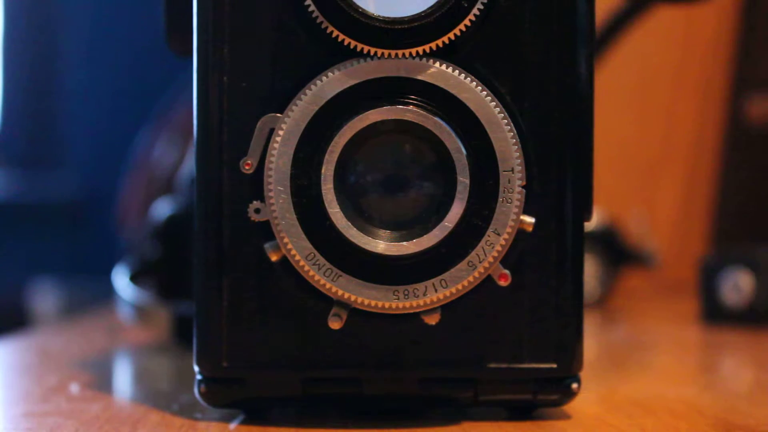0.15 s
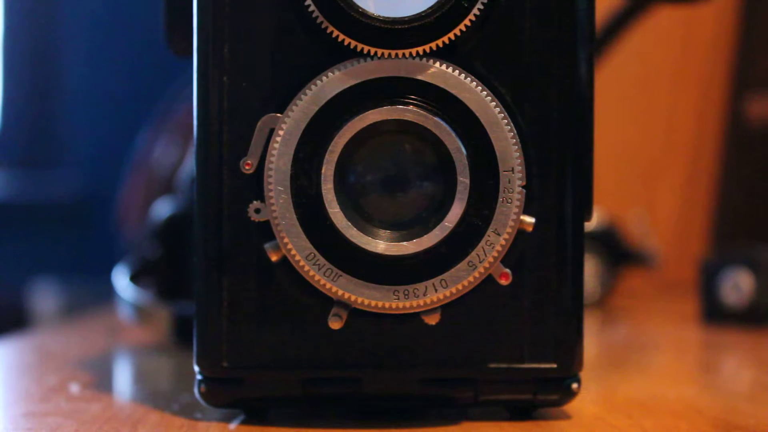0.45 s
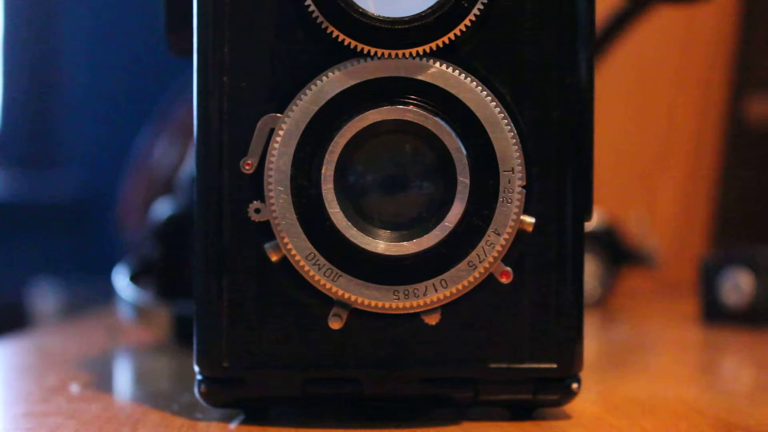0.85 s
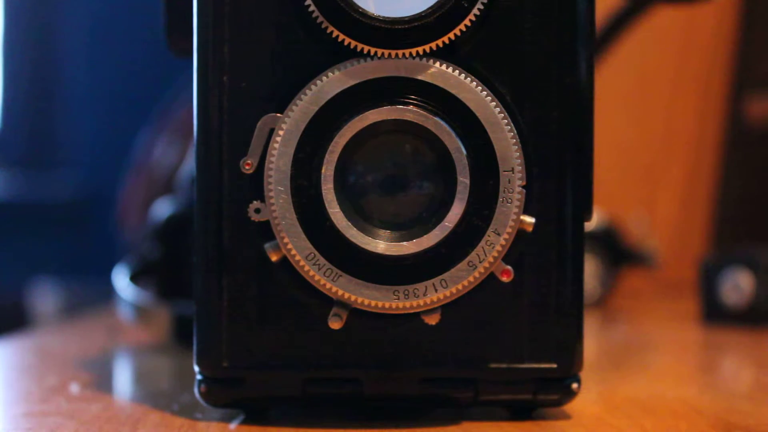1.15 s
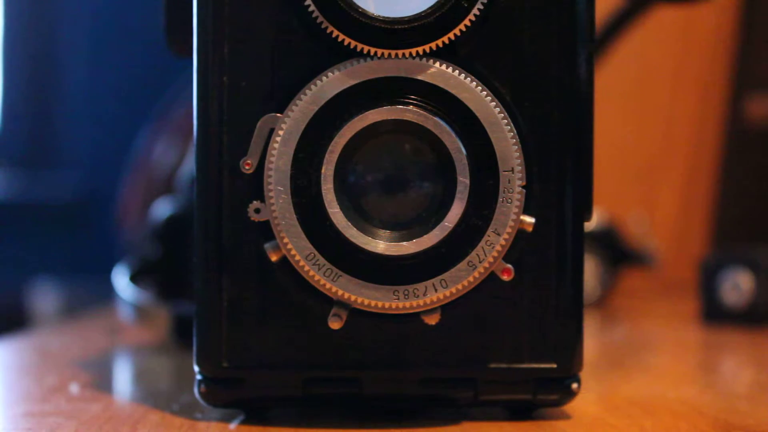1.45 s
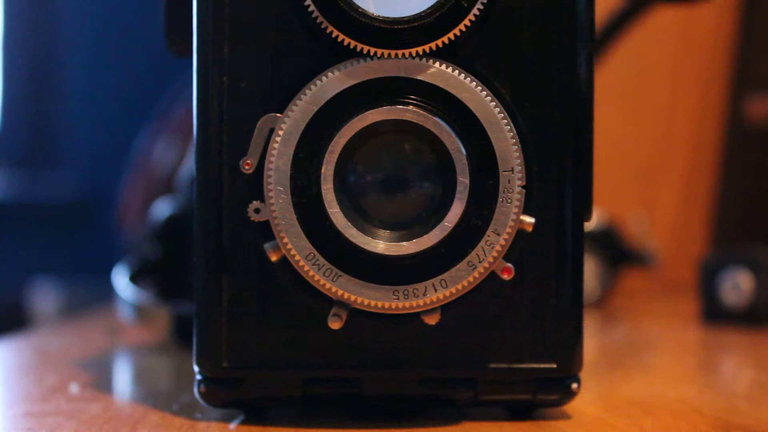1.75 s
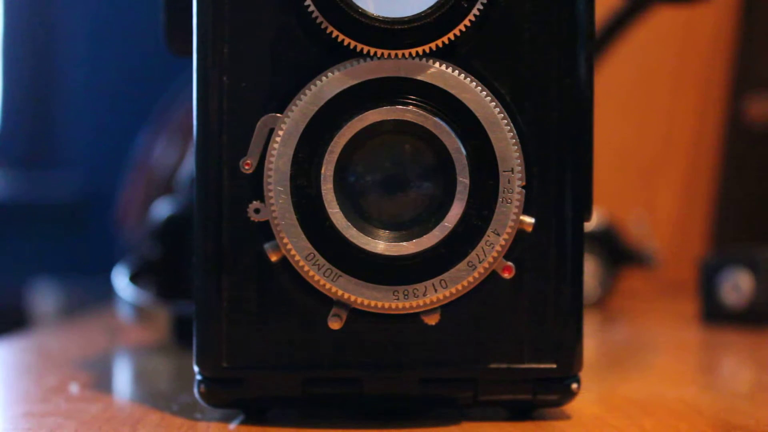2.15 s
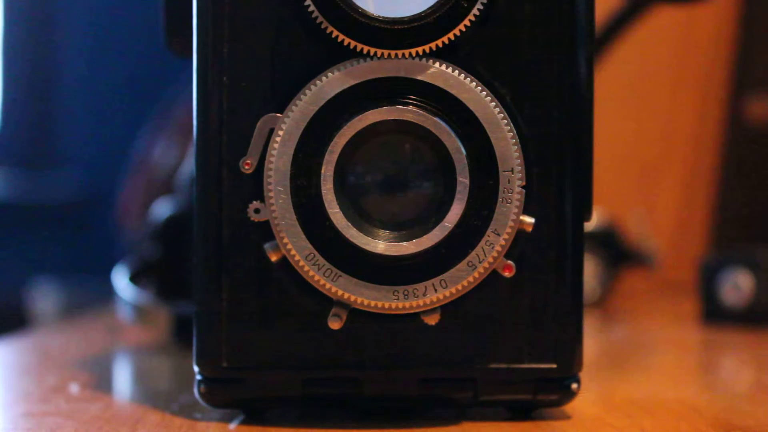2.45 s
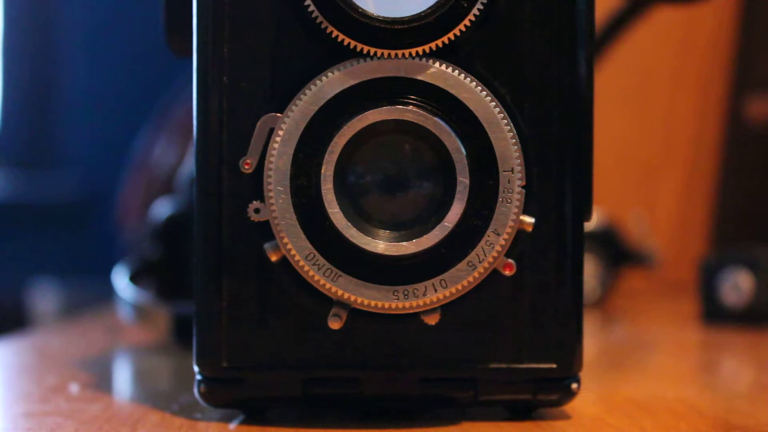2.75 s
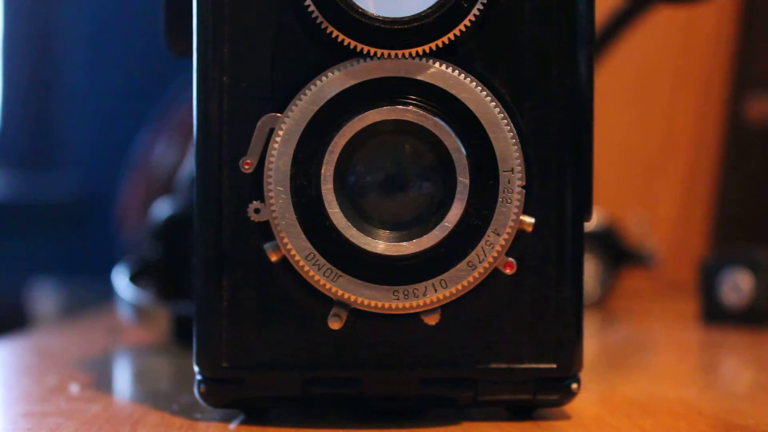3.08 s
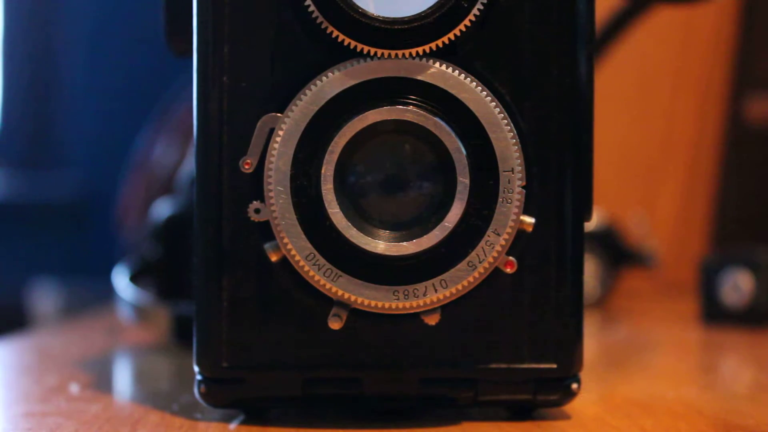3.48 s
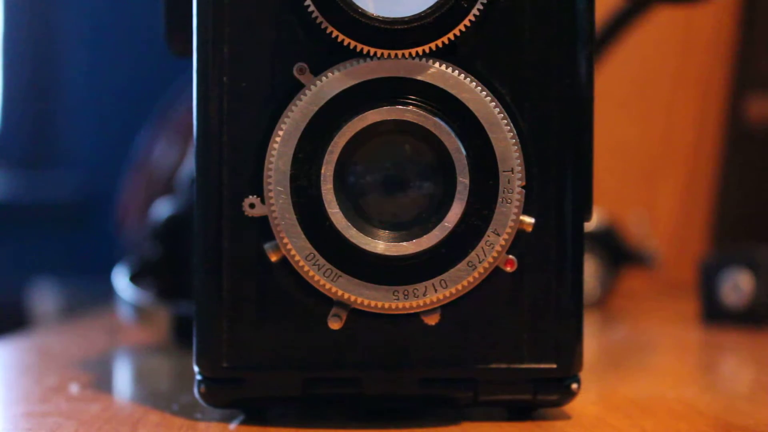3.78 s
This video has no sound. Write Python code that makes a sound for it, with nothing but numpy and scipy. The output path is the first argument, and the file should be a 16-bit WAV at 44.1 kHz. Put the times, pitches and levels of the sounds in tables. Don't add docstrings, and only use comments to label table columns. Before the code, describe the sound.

A clockwork self-timer on an old camera buzzes with fast, slightly uneven metallic ticking, then the shutter snaps open and shut loudly and the timer races briefly; close microphone, quiet room with faint hiss and hum.

```python
import sys
import numpy as np
from scipy import signal
from scipy.fft import rfft, irfft, next_fast_len
from scipy.io import wavfile

SR = 44100
rng = np.random.default_rng(int(sys.argv[2]) if len(sys.argv) > 2 else 0)


def to_wav(sig):
    pcm = np.clip(np.atleast_2d(sig), -1, 1) * 32767
    pcm = np.round(pcm).astype(np.int16)
    wavfile.write(sys.argv[1], SR, pcm.T)


def natural_amplitude(level_db):
    exponent = np.asarray(level_db, float) / 20
    return 10 ** exponent


N = 172872

# time_s, drive_db, seating_db
SPRING = [(0.0, -40, -2.5), (.3, -38.5, -2), (.6, -39, -2), (.9, -38.5, -2), (1.2, -38, -1.5),
          (1.51, -38.5, -0.5), (1.58, -38.5, -2.5), (1.9, -39.5, 1), (2.2, -38.5, 0.5), (2.5, -39, 0.5),
          (2.85, -39, 0.5), (3.15, -40, 1), (3.4, -38.5, 0), (3.71, -40, 2)]


def unit(x):
    return x / np.sqrt(np.mean(x ** 2) + 1e-20)


def along(points, hz):
    point_hz, value = np.transpose(points)
    return np.interp(np.log(hz + 1), np.log(point_hz + 1), value)


def filtered(x, response):
    size = next_fast_len(x.shape[-1] + 8192)
    spectrum = rfft(x, size) * response(np.fft.rfftfreq(size, 1 / SR))
    return irfft(spectrum, size)[..., :x.shape[-1]]


def high(hz, low_hz):
    return (1j * hz / (low_hz + 1j * hz)) ** 2


def banded(bands):
    def response(hz):
        power = sum(natural_amplitude(2 * db) / (1 + (2 * (hz - centre) / width) ** 4) for centre, width, db in bands)
        return np.sqrt(power)
    return unit(filtered(rng.standard_normal(N), response))


def place(start_s, rows):
    at = np.round(np.asarray(start_s) * SR).astype(int)[:, None] + np.arange(rows.shape[1])
    return np.bincount(at.ravel(), rows.ravel(), N + SR)[:N]


def rings(modes, t, count, vary_db):
    total = 0
    for hz, level_db, t60_s in modes:
        struck_db = level_db + vary_db * rng.standard_normal((count, 1))
        total = total + natural_amplitude(struck_db - 60 * t / t60_s) * np.sin(2 * np.pi * hz * t)
    return total


def ticks(start_s, level_db, modes, loose, vary_db, crack_db, crack_s, bounce_ms, bounce_db, cycles, shift_db=0):
    hz, tic_db, toc_db, t60_s = np.transpose(modes)
    t60_s = np.minimum(t60_s, cycles / hz)
    count = len(start_s)
    side = np.arange(count) % 2
    t = np.arange(SR // 20) / SR

    draw = rng.standard_normal((count, 2, len(hz)))
    phase = rng.uniform(0, 2 * np.pi, (2, len(hz)))[side] + loose * draw[:, 0]
    size = natural_amplitude(np.array([tic_db, toc_db])[side] + vary_db * draw[:, 1] + shift_db) * 0.01 / t60_s
    rise = 1 - np.exp(-hz[:, None] * t / 0.8)
    fade = natural_amplitude(-60 * t / t60_s[:, None]) * rise
    turn = 2 * np.pi * hz[:, None] * t
    ring = (size * np.cos(phase)) @ (fade * np.sin(turn))
    ring = ring + (size * np.sin(phase)) @ (fade * np.cos(turn))
    ring = ring * (1 - np.exp(-t / 0.00012)) / np.sqrt(np.sum(size ** 2, 1))[:, None]

    crack = 0.8 * rng.standard_normal((2, len(t)))[side] + 0.6 * rng.standard_normal(ring.shape)
    rows = ring + natural_amplitude(crack_db - 60 * t / crack_s) * crack
    rows = rows * natural_amplitude(level_db + 0.8 * rng.standard_normal(count))[:, None]
    late = rng.standard_normal((count, 2))
    bounce_s = start_s + (bounce_ms + 0.15 * late[:, 0]) / 1000
    return place(start_s, rows) + place(bounce_s, rows * natural_amplitude(bounce_db + 3 * late[:, 1:]))


def ambience():
    # hz, density_db
    air_points = [(18, -50), (30, -15), (115, -8.5), (426, -6), (499, -1.5), (988, -7), (1540, -3.5),
                  (7670, -18), (16000, -35)]
    # centre_hz, width_hz, level_db
    drone_bands = [(69, 34, -10.5), (269.3, 56.6, -1.5), (355, 35.4, 0), (504.6, 42, -2.5), (602, 106, -11),
                   (768, 126, -4.5)]
    hum_hz, beat_s, null_s, depth = 120.5, 1.74, 2.16, 0.6
    t = np.arange(N) / SR
    air = unit(filtered(rng.standard_normal(N), lambda hz: natural_amplitude(along(air_points, hz))))
    hum = np.sin(2 * np.pi * hum_hz * t)
    hum = hum - depth * np.sin(2 * np.pi * (hum_hz * t + (t - null_s) / beat_s))
    return natural_amplitude(-52) * air + natural_amplitude(-54) * banded(drone_bands) + natural_amplitude(-61) * hum


def gears():
    # centre_hz, width_hz, level_db
    whirr_bands = [(1564, 67, 3.5), (2400, 750, -3), (3580, 2400, -2.5), (4280, 91, 5), (5060, 670, 1.5),
                   (7700, 910, -34), (11100, 4900, -26)]
    whirr_db, freed_s, freed_db = -57.5, 3.81, 17.5
    t = np.arange(N) / SR
    time_s, drive_db, _ = np.transpose(SPRING)
    swing_db = np.interp(t, time_s, drive_db - drive_db.mean())
    return natural_amplitude(whirr_db + swing_db + freed_db * (t > freed_s)) * banded(whirr_bands)


def timer():
    # start_s, growing_drag_ms, end_drag_ms
    turns = [(0.0183, 0.12, -0.37), (0.1379, 0.66, -0.92), (0.2665, -0.11, -2.83), (0.4075, 0.04, 0.16),
             (0.5327, 1.65, -0.31), (0.6641, -0.39, -0.34), (0.7966, -0.26, -0.05), (0.9188, -0.65, -0.18),
             (1.0451, 0.29, -0.28), (1.1678, 0.81, 0.33), (1.3003, -0.75, 0.52), (1.4217, 0.47, 0.73),
             (1.5387, 0.22, -4.04), (1.6999, -0.33, -0.37), (1.8455, 0.89, 1.3), (1.988, -1.08, 1.45),
             (2.1232, 0.3, -1.23), (2.2529, -0.44, -2.53), (2.4003, -0.39, 0.17), (2.5305, 1.01, 0.56),
             (2.6626, 0.29, -1.09), (2.7936, -0.44, -0.13), (2.9251, -0.75, -1.67), (3.0653, 1.77, -1.64),
             (3.2124, 3.24, 1.83), (3.3856, -0.84, -0.39), (3.5501, -0.94, -0.45), (3.692, 0, 0)]
    teeth_ms = [12.72, 12.93, 10.9, 12.06, 11.38, 14.92, 10.93, 12.13, 11.12, 13.05]
    # hz, tic_db, toc_db, t60_s
    plate = [(1590, 2.5, -0.5, 0.065), (2180, -5, -3, 0.019), (3050, -7, -2, 0.015),
             (3860, -2, -3.5, 0.0059), (4157, -2.5, 2, 0.056), (2410, -13, -3.5, 0.019),
             (5500, -6, -9.5, 0.007), (6500, -2, -1, 0.005), (7690, 1.5, 0.5, 0.0066),
             (8620, -3.5, -5.5, 0.0055), (9540, -3, -14.5, 0.0044), (10960, -6.5, -15, 0.014),
             (13300, -14, -12.5, 0.0036), (3213, -4.5, -2, 0.013)]
    seat_follow = [-.5, 1, -1, 0, 1, 1, 0, 0, 0, 0, 0, 0, 0, -1]
    first_s, lag_s, short_share = 0.0044, 0.0003, 0.25
    tick_db, drag_db_per_ms = 16.5, -0.87

    start_s, grow_ms, ends_ms = np.transpose(turns)
    share = np.tile([short_share, 1 - short_share], 5) / 5
    u = np.linspace(-1, 1, 10)
    shape = np.array([u, u * u - np.mean(u * u)]) * share * 10
    shape = shape - shape.sum(1)[:, None] * share
    extra_ms = (np.diff(start_s) * 1000 - np.sum(teeth_ms))[:, None] * share
    extra_ms = extra_ms + np.array([grow_ms, ends_ms]).T[:-1] @ shape
    swings_s = (teeth_ms + extra_ms).ravel() / 1000
    gaps_s = np.concatenate([[start_s[0] - first_s], swings_s, [0.0125, 0.0146]])
    beat_s = first_s + np.cumsum(np.r_[0, gaps_s])
    drag_ms = np.concatenate([[0, 0], extra_ms.ravel(), [0, 0]])

    time_s, drive_db, seat_db = np.transpose(SPRING)
    level_db = np.interp(beat_s, time_s, drive_db) + tick_db + drag_db_per_ms * drag_ms
    beat_s, level_db = np.roll(beat_s, -1), np.roll(level_db, -1)
    return ticks(beat_s + lag_s, level_db, plate, loose=0.5, vary_db=1.2, crack_db=-8.5, crack_s=0.0049,
                 bounce_ms=0.92, bounce_db=-13, cycles=170,
                 shift_db=np.outer(np.interp(beat_s, time_s, seat_db), seat_follow))


def shutter():
    blow_s = [3.7189, 3.7216, 3.724, 3.7247, 3.7257, 3.7283, 3.799, 3.8012, 3.8021, 3.8032, 3.8053, 3.8067,
              3.8083, 3.8105]
    # level_db, noise_t60_s, case_ring_db
    blows = [(-38, .02, -10), (-23, 0.028, -13), (-4, 0.0083, -1.5), (-4.5, 0.0052, 2), (-7, 0.012, -5),
             (-19, 0.03, -10), (-8, 0.0054, -7), (-7.5, 0.006, -2), (-11, 0.018, -2), (-9.5, 0.008, 3),
             (-9, 0.017, 1), (-4, 0.0037, -6), (-13, 0.011, -5), (-33, 0.024, -7)]
    # hz, density_db
    snap = [(470, -39), (800, -31), (1290, 1.5), (2350, -4.5), (4080, -4.5), (4630, -5.5), (9690, -5),
            (16000, -12)]
    slam = [(470, -54), (800, -32), (1660, -10.5), (5380, -11.5), (6300, -12), (7640, -8), (15000, -12),
            (16000, -12.5)]
    # hz, level_db, t60_s
    case_modes = [(1194, -8.5, 0.0083), (4060, -13, 0.011), (6500, -5, 0.013), (7540, -7, 0.025),
                  (9840, -7, .005)]
    blade_modes = [(5900, -14, .01), (7410, -5, 0.011), (7660, -8, .014), (10300, -3, .008),
                   (11200, -4, .008)]
    thud_modes = [(350, -26.5, 0.035), (526, -30, 0.023), (920, -37, .02)]
    # hz, level_db, t60_s
    body_modes = [(262, 0, .22), (299, -3, .07)]
    # start_s, level_db
    knocks = [
        (3.7215, -38),
        (3.7995, -27),
    ]
    thud_s = 3.7238

    level_db, t60_s, ring_db = np.transpose(blows)
    t = np.arange(SR // 4) / SR

    def colour(points, count):
        white = rng.standard_normal((count, len(t)))
        return unit(filtered(white, lambda hz: natural_amplitude(along(points, hz))))

    noise = np.r_[colour(snap, count=6), colour(slam, count=8)]
    ring = np.r_[rings(case_modes, t, count=6, vary_db=2), rings(blade_modes, t, count=8, vary_db=2)]
    rows = noise * natural_amplitude(-60 * t / np.minimum(t60_s, 0.03)[:, None]) + natural_amplitude(ring_db)[:, None] * ring
    rows = rows * (1 - np.exp(-t / 0.00012))
    snaps = filtered(place(blow_s, rows * natural_amplitude(level_db)[:, None]), lambda hz: high(hz, low_hz=480))

    body = rings(body_modes[:1], t, count=1, vary_db=2) - rings(body_modes[1:], t, count=1, vary_db=2)
    body = body * (1 - np.exp(-t / 0.0054))
    knock_s, knock_db = np.transpose(knocks)
    thud = place([thud_s], rings(thud_modes, t, count=1, vary_db=0.5))
    thud = filtered(thud, lambda hz: high(hz, low_hz=260) ** 2)
    return snaps + place(knock_s, natural_amplitude(knock_db)[:, None] * body) + thud


def rattle():
    # start_s, level_db
    beats = [(3.7304, -7), (3.7342, -8), (3.7392, -12), (3.7429, -9), (3.7479, -13), (3.7515, -12),
             (3.7567, -12), (3.7603, -9), (3.7656, -13), (3.7693, -11), (3.7743, -12), (3.778, -11),
             (3.7832, -12), (3.7867, -11), (3.7915, -12), (3.7955, -8)]
    # hz, tic_db, toc_db, t60_s
    ring_modes = [(1320, 5, 4, 0.023), (1665, 7, 8.5, 0.027), (1900, 7, 5.5, 0.013), (2800, 0, -9, 0.014),
                  (3020, -1, -4, 0.021), (3530, -10, -1, 0.019), (4100, -14, -8, 0.014),
                  (5230, -1, -6, 0.013), (7330, -5, -2, .012), (7470, -12, 0, .012),
                  (8500, -12, -17, 0.0071), (9970, -12, -5, 0.0048), (12400, -19, -22, 0.0057),
                  (15100, -6, -9, 0.0033)]
    start_s, level_db = np.transpose(beats)
    chatter = ticks(start_s, level_db + 0.5, ring_modes, loose=0.6, vary_db=1.5, crack_db=-3, crack_s=0.007,
                    bounce_ms=0.6, bounce_db=-7, cycles=70)
    return filtered(chatter, lambda hz: high(hz, low_hz=790))


def race():
    # start_s, peak_db
    beats = [(3.8189, -17), (3.8273, -21), (3.834, -17), (3.8424, -21), (3.8491, -17), (3.8582, -21),
             (3.8654, -16), (3.8733, -19), (3.8805, -16), (3.8878, -19), (3.8951, -16), (3.9021, -18),
             (3.9099, -15), (3.9173, -17)]
    # hz, tic_db, toc_db, t60_s
    free_modes = [(1500, -12.5, -21, 0.02), (3000, -16, 5, 0.011), (3840, 4, 4, .015), (5750, 8, 2, 0.01),
                  (7000, -3.5, 9, .007), (7860, 4, 9, 0.007), (8900, 6, 2, .007), (10300, 12, -2, .005),
                  (11000, 8, -7, .005), (12600, -6, 0, .004), (14000, -10, -2, 0.004),
                  (15100, -14, -8, .004)]
    start_s, peak_db = np.transpose(beats)
    return ticks(start_s, peak_db + 2, free_modes, loose=0.7, vary_db=1.5, crack_db=-8, crack_s=0.007,
                 bounce_ms=0.8, bounce_db=-9, cycles=45)


def room(x):
    # hz, t60_s
    decay = [(300, 0.35), (3000, 0.099), (12000, 0.086)]
    hz, t, z = signal.stft(rng.standard_normal(SR // 3), SR, nperseg=128)
    tail = signal.istft(z * natural_amplitude(-60 * t / along(decay, hz)[:, None]), SR, nperseg=128)[1]
    delayed = np.pad(x, (60, 0))
    return signal.fftconvolve(delayed, tail / np.linalg.norm(tail))[:N]


def scene():
    clock = filtered(timer() + rattle() + race(), lambda hz: high(hz, low_hz=940))
    blows = shutter()
    answer = room(natural_amplitude(-11.5) * clock + natural_amplitude(-12.5) * blows)
    return (clock + blows + gears() + answer + ambience())[None]


def roll_off(x):
    return signal.sosfilt(signal.butter(12, 16990, fs=SR, output="sos"), x)


def record(dry):
    duck_s, duck_db, hold_s, recover_s = 3.7225, -3.5, 0.09, 0.31
    ceiling, mic_low_hz, top_hz = 0.8, 35.3, 15900
    t = np.arange(N) / SR - duck_s
    recovery = np.exp(-np.maximum(t - hold_s, 0) / recover_s)
    ducked = dry * natural_amplitude(duck_db * np.clip(t / 0.003, 0, 1) * recovery)
    held = ducked / (1 + np.abs(ducked / ceiling) ** 4) ** 0.25
    return roll_off(filtered(held, lambda hz: high(hz, mic_low_hz) * (hz < top_hz)))


dry = scene()
out = record(dry)
to_wav(out)
```